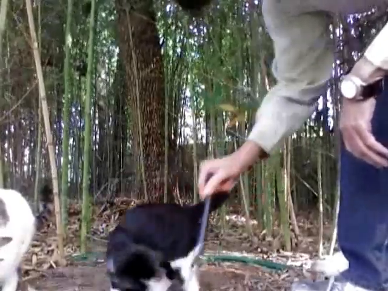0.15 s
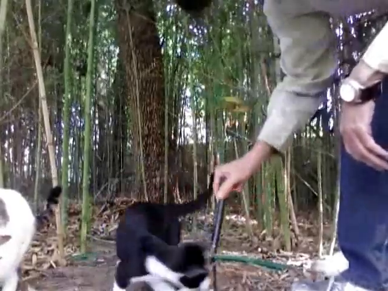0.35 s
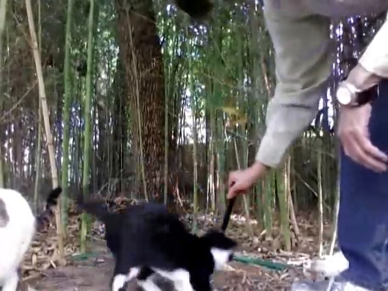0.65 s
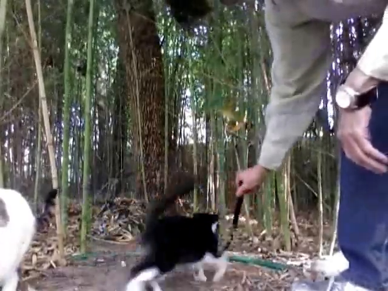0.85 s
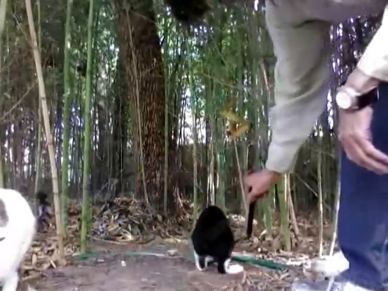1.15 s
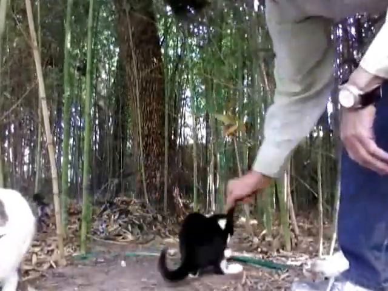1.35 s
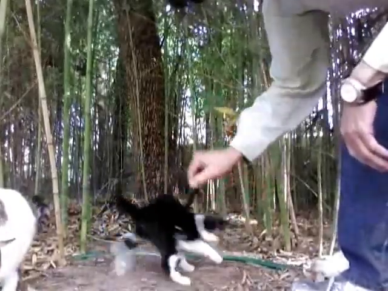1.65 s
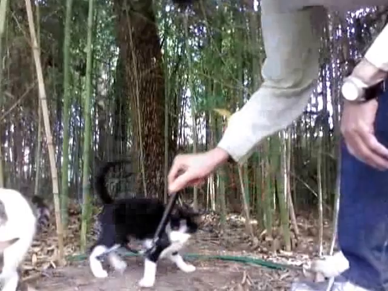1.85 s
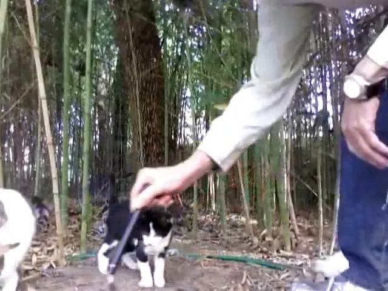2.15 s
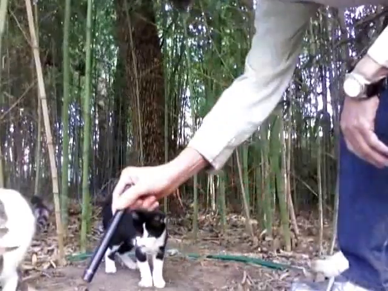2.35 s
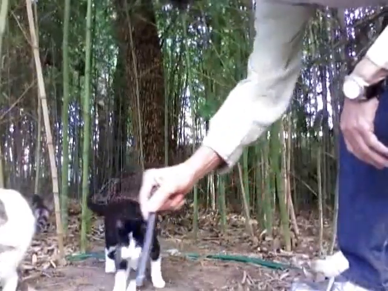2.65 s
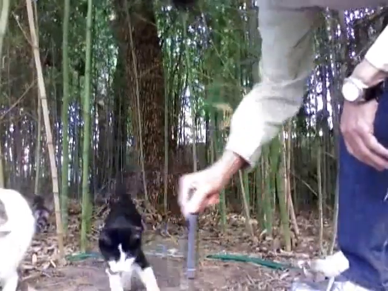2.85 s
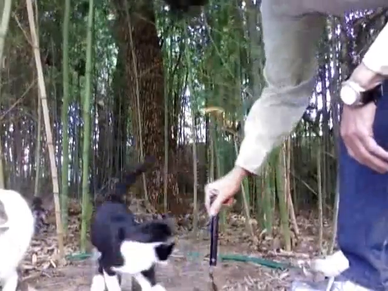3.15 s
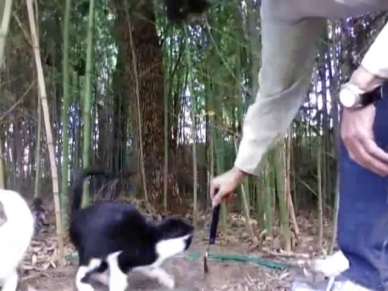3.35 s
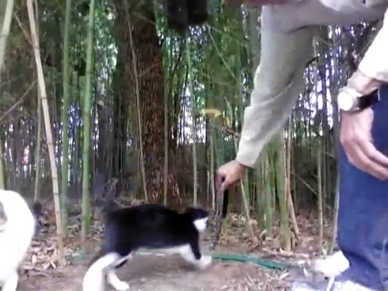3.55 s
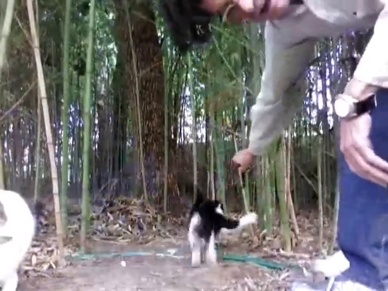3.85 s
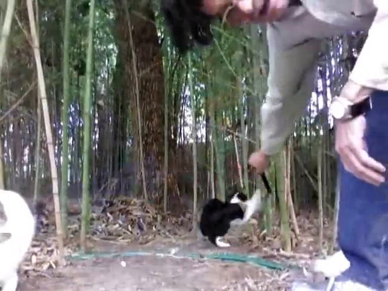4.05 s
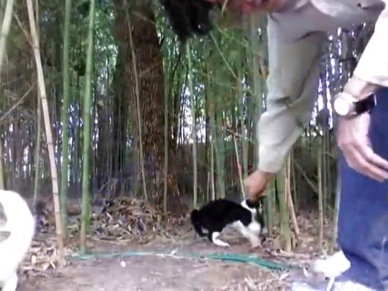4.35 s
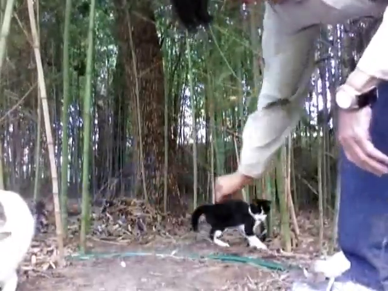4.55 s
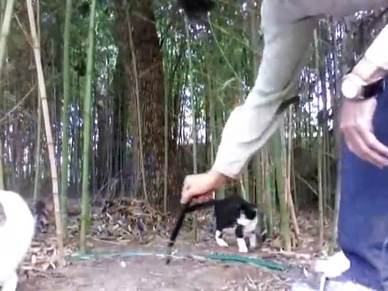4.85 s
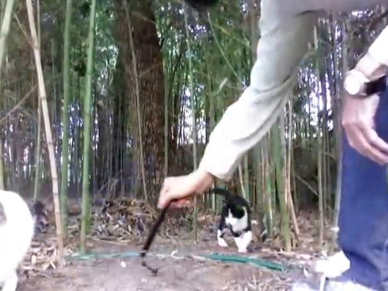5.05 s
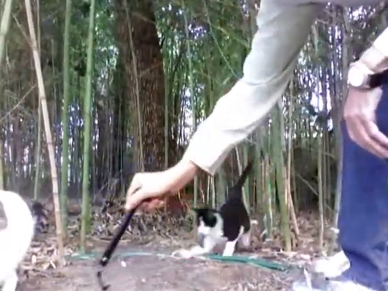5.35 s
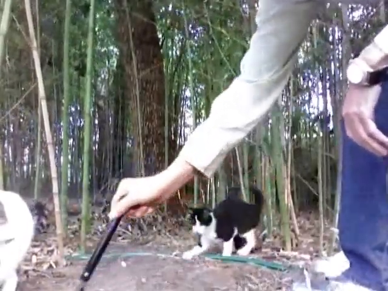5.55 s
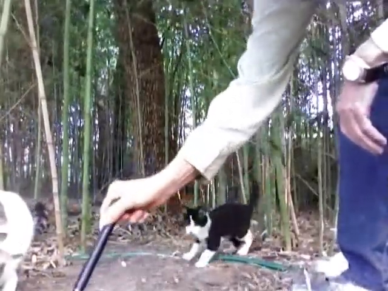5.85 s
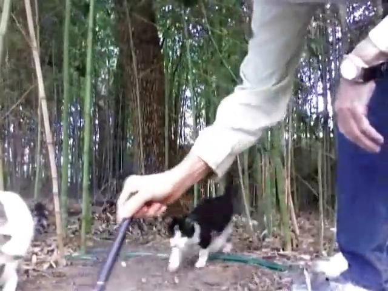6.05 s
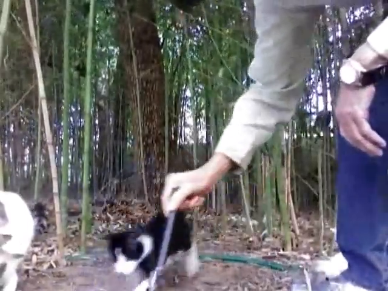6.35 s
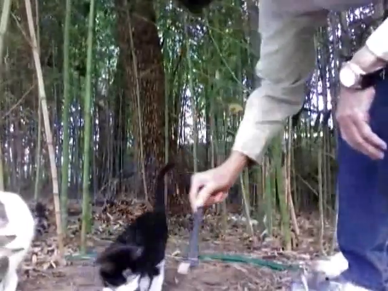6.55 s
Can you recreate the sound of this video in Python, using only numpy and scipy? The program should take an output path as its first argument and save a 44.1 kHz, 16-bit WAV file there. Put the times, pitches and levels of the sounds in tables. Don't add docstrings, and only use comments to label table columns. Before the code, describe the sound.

Wind through dry foliage, caught by a small camera's bare microphone with a dull top end. First a gentle papery rustle and one crisp leaf snap, then a faint lull. The second swell grows much louder, leaves and stems rushing together, with muffled irregular thuds of wind hitting the capsule, hardest past five seconds, before it quickly subsides.

```python
import sys
import numpy as np
from scipy import signal
from scipy.fft import rfft, irfft, next_fast_len
from scipy.io import wavfile
from scipy.ndimage import uniform_filter1d

SR = 44100
rng = np.random.default_rng(int(sys.argv[2]) if len(sys.argv) > 2 else 0)


def volts(x):
    e = np.asarray(x, float) / 20
    return 10 ** e


def put_to_file(sound):
    columns = np.atleast_2d(sound).T
    safe = np.clip(columns, -1, 1)
    whole_steps = np.round(safe * 32767)
    wavfile.write(sys.argv[1], SR, whole_steps.astype(np.int16))


N = 295911

# middle in seconds, peak in dB, pitch in Hz, length in ms.
THUMPS = [(0.122, -30.5, 163, 7), (0.16, -30, 151, 9.5), (2.606, -28, 169, 8.1), (2.663, -27, 194, 4.2),
          (3.03, -28, 129, 14), (3.216, -24, 137, 22), (3.25, -20.5, 182, 4.3), (3.286, -26, 144, 42),
          (3.418, -26, 121, 13), (3.797, -26.5, 200, 4.4), (4.043, -28.5, 145, 13), (4.465, -28, 173, 5.8),
          (4.49, -20.5, 135, 17), (4.54, -20.5, 188, 7.4), (4.563, -8, 172, 9), (4.578, -10, 177, 5.6),
          (4.654, -24, 153, 17), (4.83, -19, 171, 5.6), (5.182, -3, 159.6, 6.4), (5.224, -20.5, 139, 7),
          (5.353, -14, 146.5, 14), (5.393, -22.5, 119, 28), (5.44, -21, 138, 24), (5.498, -16.5, 141, 10),
          (5.875, -21, 168, 13), (5.974, -15.5, 140, 8.9), (6.034, -21, 151, 12), (6.085, -26, 141.5, 18),
          (6.492, -32, 195, 7.9), (6.538, -29, 142, 7.1)]
# middle in seconds, peak in dB, pitch in Hz, length
# in ms.
MORE_THUMPS = [
    (4.595, -16.5, 148, 6.4),
    (5.194, -15, 249, 5.6),
    (5.963, -15, 282, 5),
    (5.998, -15.5, 158, 5.3),
]
# middle in seconds, peak in dB, pitch in Hz, length in ms.
TAPS = [(0.046, -51, 150, 8), (0.2, -45, 161, 5), (0.63, -47, 143, 5.7), (0.66, -47, 157, 3.6),
        (0.797, -44, 191, 3.8), (0.89, -44.5, 137, 11), (0.98, -50, 159, 6), (1.262, -45.5, 141, 12),
        (1.289, -52.5, 142, 15), (1.619, -54, 141, 9.1), (1.862, -45, 140, 7.2), (1.887, -44, 134, 13),
        (1.971, -58, 140, 10), (2.12, -47, 135, 13), (2.136, -44, 134, 6), (2.229, -64, 140, 10),
        (2.378, -53, 113, 6), (2.398, -40, 149, 6), (4.174, -39.5, 279, 5), (4.216, -47, 268, 4.5),
        (4.322, -35.5, 186, 9.2), (5.576, -31, 157, 6), (5.752, -30, 161, 5.6), (5.832, -30, 179, 6.8),
        (6.153, -45, 157, 5), (6.454, -33.5, 132, 25), (6.573, -46, 165, 5), (6.7, -49, 154, 12)]
# frequency in Hz, density in dB per Hz.
EDDY = [(15, -71.5), (25, -24), (75, -13.5), (111, -1), (136, 4), (179, -9.5), (216, -7.5), (251, -9),
        (500, -31.5), (650, -59.5), (1100, -120)]


def grove():
    puffs = 0.4 * flutter(30) + 0.82 * flutter(55)
    return leaves(puffs) + canopy(puffs) + stems(puffs) + distant_roar()


def leaves(puffs):
    # frequency in Hz, density in dB per Hz.
    spectrum = [(2350, -23), (4000, -11), (5330, -1.5), (6120, -0.5), (6980, -8.5), (7500, -17),
                (7800, -22.5), (10100, -59), (17200, -120)]
    rustle = foliage(spectrum, patchy_db=0.62, fleck_db=3.0, shared_db=1.6 * puffs)
    return rustle * answer(-35, per_wind=1, per_depth=-0.32, lag_s=-0.0176, shake_share=0.65)


def canopy(puffs):
    # frequency in Hz, density in dB per Hz.
    spectrum = [(390, -33), (660, -9), (734, -0.5), (872, -4), (1090, -1.5), (1260, -3.5), (1610, 0.5),
                (2000, -9), (2600, -32.5), (4400, -120)]
    shared_db = 0.32 * puffs + 0.9 * flutter(16)
    rush = foliage(spectrum, patchy_db=0.27, fleck_db=4.0, shared_db=shared_db)
    return rush * answer(-45, per_wind=0.8859, per_depth=0.99, lag_s=0.09, shake_share=0.42)


def stems(puffs):
    # frequency in Hz, density in dB per Hz.
    spectrum = [(1120, -32), (1900, -5.5), (2320, -5), (3800, -5.5), (4200, -3.5), (5460, -23),
                (9240, -120)]
    shared_db = 1.4 * puffs + 0.3 * flutter(18)
    rubbing = foliage(spectrum, patchy_db=0.4, fleck_db=3.5, shared_db=shared_db)
    return rubbing * answer(-43.5, per_wind=1.01, per_depth=0.55, lag_s=-0.01, shake_share=0.64, sway_share=0.94)


def distant_roar():
    # frequency in Hz, density in dB per Hz.
    spectrum = [(150, -38.5), (230, -5), (330, 0.5), (500, -5), (640, -1), (760, -24)]
    far = foliage(spectrum, patchy_db=-1.5, fleck_db=6.5, shared_db=0)
    gain = answer(-65, per_wind=1.15, per_depth=0, lag_s=0.36, shake_share=0.1)
    with_eddies = volts(-27.5) * uniform_filter1d(turbulence(), size=4000)
    still_air = volts(-82.5)
    return (gain + with_eddies + still_air) * far


def foliage(points, patchy_db, fleck_db, shared_db):
    shape = 257, N // 128 + 8
    real, imaginary = rng.standard_normal((2, *shape))
    patches = blotches(shape, 10, 14)
    flecks = blotches(shape, 3, 6)
    cells = (real + 1j * imaginary) * volts(patchy_db * patches + fleck_db * flecks)
    wash = signal.istft(cells, nperseg=512, noverlap=384)[1]
    return coloured(wash[:N] * volts(shared_db), points)


def answer(base_db, per_wind, per_depth, lag_s, shake_share, sway_share=0):
    # middle in seconds, length in seconds, change in dB.
    shakes = [(0.436, 0.031, 4.5), (0.61, .1, 2), (0.957, 0.05, 8), (1.09, 0.082, 2), (1.85, .05, 4),
              (2.12, 0.03, 1.5), (2.183, 0.059, -9), (2.507, .05, 5.5), (2.621, .03, 3),
              (2.99, 0.031, -5.5), (3.186, 0.14, -2.5), (3.261, 0.074, 7.5), (3.43, .03, 7),
              (3.466, 0.063, -7.5), (3.994, 0.062, -8), (4.3, 0.067, -0.5), (4.74, 0.028, 2),
              (4.853, 0.017, 5), (5.044, 0.27, -2.5), (5.22, 0.12, 0.5), (5.35, 0.054, -2),
              (5.457, 0.038, -4.5), (5.477, 0.022, 0), (5.628, 0.062, 2), (5.804, 0.2, -7),
              (5.992, 0.033, 3.5), (6.14, 0.11, 1), (1.7, .14, -0.5), (3.58, 0.061, 0.5), (6.49, 0.22, 8)]
    # middle in seconds, length in seconds, change in dB.
    sways = [
        (0.7, 0.28, -4),
        (1.62, 0.43, -2),
        (2.1, 0.27, -5.5),
        (2.8, 0.33, 3),
        (3.14, 0.16, -1),
        (3.55, 0.22, 0.5),
        (3.9, 0.22, 2.5),
        (5.1, .15, 1),
        (5.55, .25, -2),
        (6.45, 0.21, -2),
    ]
    reference_wind_db = -35
    db = base_db + per_wind * (wind_of(1, lag_s) - reference_wind_db) + per_depth * wind_of(2)
    db = db + shake_share * bumps(shakes) + sway_share * bumps(sways)
    return np.interp(np.arange(N) / SR, clock(), volts(db))


def wind_of(column, lag_s=0):
    # time in seconds, rustle of the near leaves in dB, how deep in the grove it blows in dB.
    gust = [(0.0, -47, 2.5), (0.1, -43.5, -1), (0.5, -45, 1), (0.85, -47.5, -1), (1.15, -49.5, 1.5),
            (1.55, -56, 0), (1.8, -47.5, 1.5), (2.2, -37, -1), (2.55, -32.5, 0.5), (2.9, -35, -2.5),
            (3.15, -38, 1.5), (3.65, -30.5, 0.5), (4.3, -26, -0.5), (4.8, -25, -1.2), (5.65, -31.5, -1),
            (6.1, -34.5, -1), (6.36, -46, 0.5), (6.71, -47, 5)]
    rows = np.array(gust)
    return np.interp(clock() - lag_s, rows[:, 0], rows[:, column])


def snaps():
    # middle in seconds, peak in dB, pitch in Hz.
    events = [
        (0.0383, -17.5, 5870),
        (0.943, -27, 5630),
        (1.8355, -25, 5850),
        (3.486, -18, 6010),
        (5.9754, -23, 6470),
    ]
    strikes = [(0, 0.9), (0.0024, 0.47), (0.0046, 0.35)]
    out = np.zeros(N)
    t = np.arange(-400, 400) / SR
    for s, db, hz in events:
        shape = sum(gain * np.exp(-((t - late) / 0.0013) ** 2) for late, gain in strikes)
        add(out, s + 0.0004, volts(db - 6.5) * shape * np.sin(2 * np.pi * hz * t))
    return out


def buffets():
    lumps = volts(4.34 * flutter(25) - 7.5)
    strength = turbulence()
    out = strength * lumps * coloured(rng.standard_normal(N), EDDY)
    for s, db, hz, ms in np.r_[THUMPS + MORE_THUMPS + TAPS, small_eddies(strength)]:
        add(out, s, volts(db) * eddy(hz, ms))
    return signal.sosfilt(signal.butter(3, 55, "high", fs=SR, output="sos"), out)


def eddy(hz, ms):
    start, edge, late = rng.random(3)
    t = np.arange(-1500, 1500) / SR
    half_s = max(ms, 4) / 1000 * np.where(t < 0, 0.65, 0.95)
    swing = np.exp(-(t / half_s) ** 2) * np.cos(2 * np.pi * (hz * t * (1 - 5.7 * t) + start))
    envelope = np.exp(-((t - 0.019 * late + 0.0067) / 0.0032) ** 2)
    rider = envelope * np.cos(2 * np.pi * (hz * t * (1.253 + 0.93 * edge) + edge))
    return swing + 0.18 * rider


def small_eddies(strength):
    late, size, pitch, span = rng.random((220, 4)).T
    s = (np.arange(len(late)) + 0.7 * late) * 0.038
    db = 20 * np.log10(np.interp(s, np.arange(N) / SR, strength)) + 4.5 - 9.5 * size
    hz = np.interp(pitch, (0, 1), (115, 201.6))
    ms = np.interp(span, (0, 1), (6.1, 15.5))
    single_s = np.array(THUMPS + MORE_THUMPS + TAPS)[:, 0]
    near = abs(s[:, None] - single_s).min(axis=1) < 0.018
    return np.c_[s, db, hz, ms][(s < N / SR) & ~near]


def turbulence():
    # middle in seconds, length in seconds, rumble in dB.
    packs = [(0.156, 0.072, -36.5), (0.64, 0.033, -50), (0.775, 0.066, -48.5), (0.93, .11, -55),
             (1.29, 0.098, -62), (1.68, .16, -60), (1.878, .05, -51), (2.133, 0.037, -66),
             (2.442, 0.17, -47), (2.637, 0.14, -37.5), (2.85, 0.27, -41.5), (3.07, 0.28, -38.5),
             (3.249, 0.095, -26.5), (3.416, .12, -32), (3.623, .16, -40), (3.794, .12, -32),
             (3.974, 0.18, -37.5), (4.4, 0.091, -41), (4.49, 0.052, -24.5), (4.576, 0.07, -17),
             (4.673, 0.22, -29.5), (4.842, .08, -27), (4.962, 0.099, -31), (5.114, 0.091, -33.5),
             (5.22, 0.086, -26.5), (5.385, 0.25, -25.5), (5.855, 0.22, -32.5), (5.979, 0.049, -17),
             (6.06, 0.077, -34), (6.514, 0.13, -36.5)]
    fade_db_per_s = 500.5
    t = clock()
    levels = [db - fade_db_per_s * np.maximum(abs(t - s) - length / 2, 0) for s, length, db in packs]
    return np.interp(np.arange(N) / SR, t, volts(np.max(levels, axis=0)) + 1e-6)


def calm():
    under_wind_db, still_db = -27, -79
    level = volts(wind_of(1, 0.13) + under_wind_db) + volts(still_db)
    gain = np.interp(np.arange(N) / SR, clock(), level)
    air = volts(2.5 * flutter(22)) * coloured(rng.standard_normal(N), EDDY)
    return gain * signal.sosfilt(signal.butter(4, 100, "high", fs=SR, output="sos"), air)


def evened(x):
    return x / np.sqrt(np.mean(x ** 2) + 1e-20)


def read(points, hz):
    f, value = np.transpose(points)
    return np.interp(np.log(hz + 1), np.log(f + 1), value)


def coloured(x, points):
    size = next_fast_len(N)
    gain = volts(read(points, np.fft.rfftfreq(size, 1 / SR)))
    return evened(irfft(rfft(x, size) * gain, size)[:N])


def flutter(per_s):
    t = np.arange(N) / SR
    knots = rng.standard_normal(size=400)
    return np.interp(t * per_s, np.arange(len(knots)), knots)


def blotches(shape, bins, frames):
    across = uniform_filter1d(rng.standard_normal(shape), bins, axis=0)
    return evened(uniform_filter1d(across, frames, axis=1))


def bumps(rows):
    return sum(db * np.exp(-(2 * (clock() - s) / length) ** 2) for s, length, db in rows)


def clock():
    step = 32
    return np.arange(0, N + step, step) / SR


def add(mix, s, sound):
    start = round(s * SR) - len(sound) // 2
    part = mix[max(start, 0):start + len(sound)]
    part += sound[max(-start, 0):][:len(part)]


def scene():
    return (grove() + snaps() + buffets() + calm())[None]


def band_limit(x):
    return signal.sosfilt(signal.butter(12, 10850, fs=SR, output="sos"), x)


def record(dry):
    # frequency in Hz, gain in dB.
    mirror = [(8200, -5.5), (8600, -17.5), (9000, -31.5), (9200, -52), (9350, -74.5), (9700, -64.5),
              (10800, -72)]
    sampling_hz, gap_hz = 16000, 200
    size = next_fast_len(N)
    hz = np.fft.rfftfreq(size, 1 / SR)
    below = volts(-45 * np.clip((hz - sampling_hz / 2 + gap_hz) / 120, 0, 3))
    base = irfft(rfft(dry, size) * below, size)[:, :N]
    image = 2 * base * np.cos(2 * np.pi * sampling_hz * np.arange(N) / SR)
    kept = volts(read(mirror, hz)) * (hz > sampling_hz / 2)
    finished = base + irfft(rfft(image, size) * kept, size)[:, :N]
    return band_limit(finished)


dry = scene()
out = record(dry)
put_to_file(out)
```